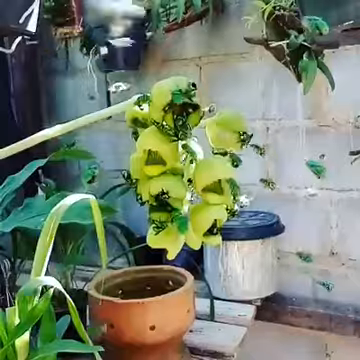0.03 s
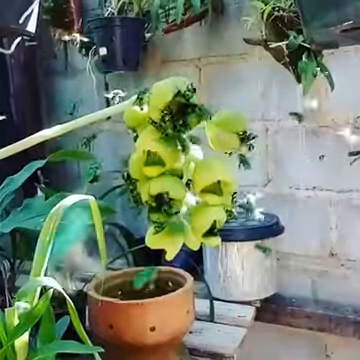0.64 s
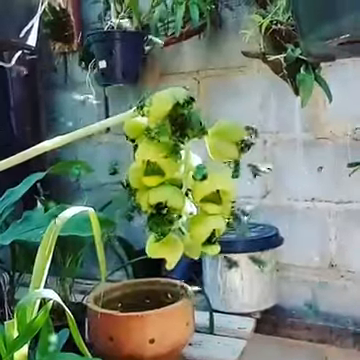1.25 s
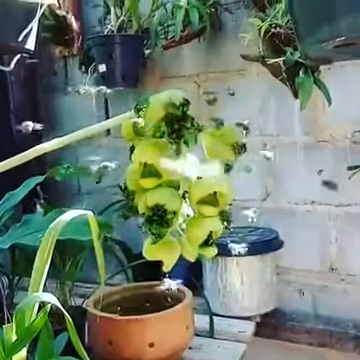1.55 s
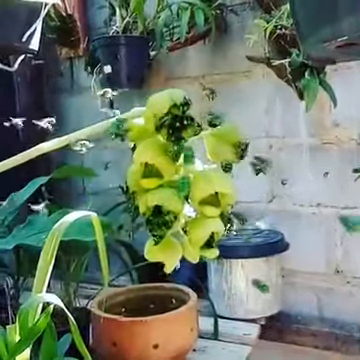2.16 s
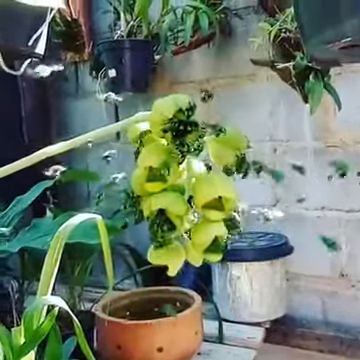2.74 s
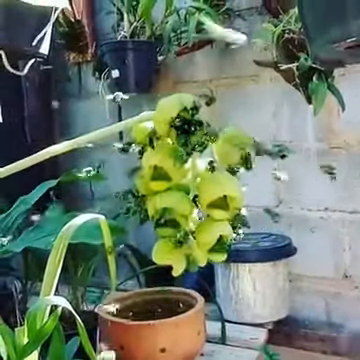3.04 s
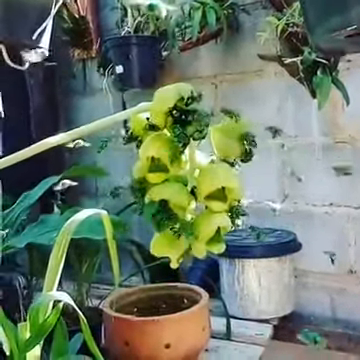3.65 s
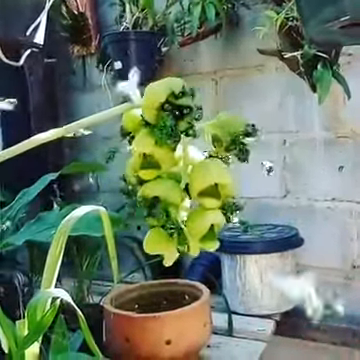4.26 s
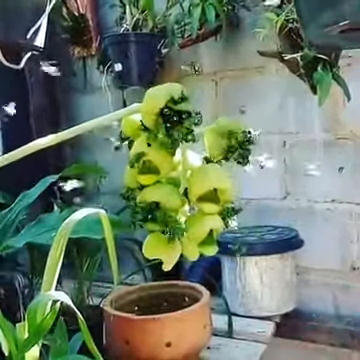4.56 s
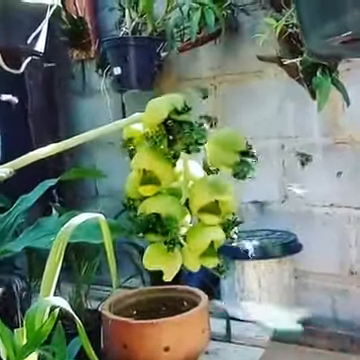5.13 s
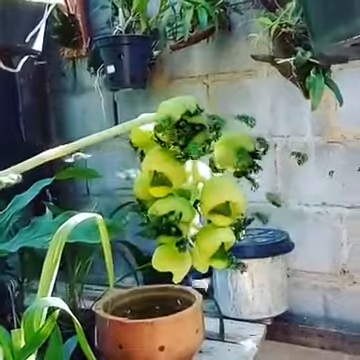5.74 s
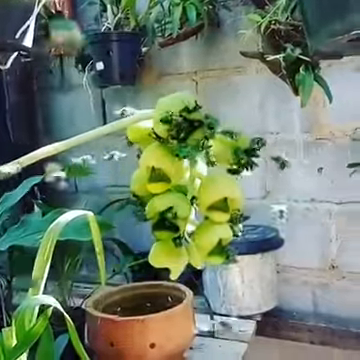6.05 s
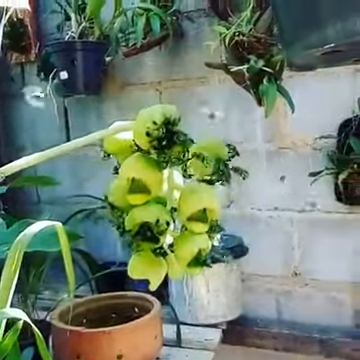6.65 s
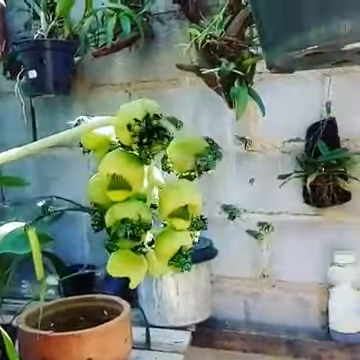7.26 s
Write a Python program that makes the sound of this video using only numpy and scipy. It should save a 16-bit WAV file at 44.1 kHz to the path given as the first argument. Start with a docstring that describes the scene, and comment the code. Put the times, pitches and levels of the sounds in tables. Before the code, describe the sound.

After a moment of silence, the dense hum of many small bees fades in around flowers in a walled yard, with a faint fizz of wings. The microphone takes one soft bump. Single bees swell past close by. A quick run of high, hissy rasps, perhaps a small bird, rings between the walls, and a few more follow later. Far traffic and a low engine drone continue underneath.

```python
"""The hum of small bees fades in, close by, as they work an orchid spike in a walled yard.
Each bee's periodic wing stroke radiates harmonics of a wandering wingbeat and a puff of air noise.
The microphone takes one soft bump; rasping, hissy bursts (perhaps a small bird) ring between the walls.
Far off, an engine and passing vehicles drone under a broad wash of traffic and open air."""
import sys
import numpy as np
from scipy import signal
from scipy.fft import rfft, irfft, next_fast_len
from scipy.io import wavfile
from scipy.ndimage import map_coordinates

SR = 44100
rng = np.random.default_rng(int(sys.argv[2]) if len(sys.argv) > 2 else 0)


def int16_out(signal):
    """Quantize to a 16-bit WAV file."""
    q = np.round(np.clip(np.atleast_2d(signal).T, -1, 1) * 32767)
    wavfile.write(sys.argv[1], SR, q.astype(np.int16))


N = 330750

# spectral envelope of the wingbeat's harmonics: (frequency [Hz], relative level [dB])
WING_SPECTRUM = [(240, -4.4), (480, -.8), (690, -2.5), (800, -8.5), (970, -8), (1250, -5.5), (1380, -10.5),
                 (1500, -8.5), (1750, -15), (2300, -13.5), (2750, -22), (3500, -21.5), (6500, -23),
                 (8500, -32.5)]


def amp(db):
    """Amplitude ratio of a level: tenfold for every 20 dB."""
    return 10 ** (np.asarray(db) / 20)


def unit(x):
    """Normalisation to an rms of 1."""
    return x / np.sqrt(np.mean(x ** 2) + 1e-20)


def curves(rows):
    """Linear interpolation of each column after the time, one value per sample."""
    times, *columns = np.transpose(rows)
    return [np.interp(np.arange(N) / SR, times, column) for column in columns]


def wobble(rate):
    """Smooth random modulation: a spline through Gaussian knots, rate of them a second."""
    at = np.linspace(0, N, 6000)
    knots = rng.standard_normal(1024)
    spline = map_coordinates(knots, [at * rate / SR], mode="wrap")
    return np.interp(np.arange(N), at, spline)


def filtered(x, response):
    """Linear filtering: the spectrum of x times a frequency response."""
    size = next_fast_len(len(x) + SR // 10, real=True)
    return irfft(rfft(x, size) * response(np.fft.rfftfreq(size, 1 / SR)), size)[:len(x)]


def coloured(x, spectrum):
    """Spectral shaping of x by (frequency [Hz], relative level [dB]) points, to an rms of 1."""
    points_hz, db = np.transpose(spectrum)
    return unit(filtered(x, lambda hz: amp(np.interp(np.log(hz + 1), np.log(points_hz), db))))


def cycles(hz):
    """Phase in cycles: the time integral of frequency, from a random start."""
    return np.cumsum(hz) / SR + rng.random()


def bee(beat_hz, scatter_rad, uneven_db, harmonics=34, size=4096):
    """A periodic wing stroke gives a harmonic series. Returns the tone and the envelope of its puffs."""
    phase, strength = rng.standard_normal((2, harmonics))
    partials = amp(uneven_db * strength) * np.exp(1j * scatter_rad * phase)
    stroke = unit(irfft(np.r_[0, partials], size))
    puff = np.cos(np.pi * np.arange(size) / size) ** 8
    place = (cycles(beat_hz) * size).astype(int) % size
    return stroke[place], puff[place]


def swarm(beat_hz=243.5, spread=.038, wander=.031, flutter=.017, swoop_db=4.0, count=24):
    """Incoherent sources: independent wingbeats add into a hum, their turbulent puffs into a fizz."""
    # the swarm crowds in and thins out: (time [s], hum level [dB], fizz level [dB]), before the trims
    crowding = [(0.95, -50, -62), (1.4, -50.5, -59), (1.75, -50, -61), (2.0, -50.5, -59.5),
                (3.05, -51.5, -60.0), (3.5, -50.5, -58.5), (3.78, -49, -57.9), (4.0, -49.5, -58),
                (4.4, -48.5, -64.5), (4.75, -51, -59), (5.0, -50, -61.5), (5.3, -51.5, -66),
                (5.65, -48.5, -58.5), (5.9, -53, -63), (6.3, -50, -58.5), (6.85, -52, -60),
                (7.2, -49.5, -58), (7.5, -52, -58.5)]
    # air torn by the wing tips: (frequency [Hz], relative level [dB])
    fizz_spectrum = [(1500, -15.5), (1950, -2.5), (2350, 3), (2700, -4.5), (3500, -2.5), (3800, -11.5),
                     (4150, -0.5), (5000, 2.5), (5450, -0.5), (6700, .5), (6850, -4.5), (7450, -1.5),
                     (7750, -11), (8600, -12.5)]
    hum_trim_db, fizz_trim_db = .28, -1.0
    hum, puff_power = np.zeros(N), np.zeros(N)
    for rank in np.linspace(-1, 1, count):
        detune = spread * rank * (1 + rank ** 2 / 2)
        # steering bends the wingbeat slowly, small adjustments quickly
        pitch = beat_hz * (1 + detune + wander * wobble(6) + flutter * wobble(35))
        nearness = amp(swoop_db * 2 * np.tanh(wobble(5) / 2))
        tone, puff = bee(pitch, scatter_rad=1.084, uneven_db=2.5)
        hum += nearness * tone
        puff_power += nearness ** 2 * puff
    hum_db, fizz_db = curves(crowding)
    fizz = coloured(np.sqrt(puff_power) * rng.standard_normal(N), fizz_spectrum)
    return amp(hum_db + hum_trim_db) * coloured(hum, WING_SPECTRUM) + amp(fizz_db + fizz_trim_db) * fizz


def close_bees(doppler=.008, flutter=.016, waver_db=1.5, trim_db=-.5, near_bass_db=3):
    """Spherical spreading and Doppler shift: a passing bee's pressure goes as 1/r and its pitch sinks."""
    # each bee at its closest: (time [s], wingbeat [Hz], level before the trim [dB])
    passes = [(1.52, 245.3, -54.5), (1.76, 242.6, -54), (2.62, 242.8, -54.5), (2.792, 241, -56.5),
              (3.17, 239.2, -52.5), (3.75, 235.0, -53.5), (4.19, 239.3, -53.5), (4.51, 249.1, -55),
              (5.63, 251, -55), (5.71, 232.1, -54.5), (5.99, 231.8, -54.5), (6.252, 231.1, -55.5),
              (6.54, 233.4, -55.5), (7.19, 231.8, -53.5)]
    half_power_s, reach_s = .09, .6  # from the closest point until 3 dB down, until lost in the hum
    t, out = np.arange(N) / SR, np.zeros(N)
    for closest_s, beat_hz, db in passes:
        near = np.abs(t - closest_s) < reach_s
        along = (t[near] - closest_s) / half_power_s
        distance = np.hypot(1, along)  # in multiples of the closest distance
        pitch = beat_hz * (1 - doppler * along / distance + flutter * wobble(22)[near])
        tone, _ = bee(pitch, scatter_rad=1.4, uneven_db=1.5)
        edges = signal.get_window(("tukey", .5), len(tone))
        out[near] += edges * amp(db + trim_db + waver_db * wobble(12)[near]) / distance * tone
    # in the near field, the air pushed by the wings lifts the fundamental
    (fundamental_hz, fundamental_db), *overtones = WING_SPECTRUM
    return out.std() * coloured(out, [(fundamental_hz, fundamental_db + near_bass_db), *overtones])


def scratch(rough_db=1.5, grain_rate=260):
    """Roughness from fast random amplitude modulation: one second of grainy noise."""
    grain = amp(rough_db * 2 * np.tanh(wobble(grain_rate)[:SR] / 2))
    return grain * rng.standard_normal(SR)


def rasps(rise_s=.015, hiss_t60=.45):
    """Exponential decay: each burst's broad hiss and narrow resonance trail off between the walls."""
    # (time [s], ring level [dB], ring pitch [Hz], hold [s], ring's 60 dB decay [s], hiss level [dB])
    bursts = [(2.138, -63.5, 6200, .06, .4, -71), (2.207, -53, 4260, 0.14, .95, -60),
              (2.426, -49.5, 4270, .055, .9, -48.5), (2.511, -48.5, 4240, .06, 1, -61),
              (2.663, -45.5, 4310, 0.053, 0.92, -45.5), (2.758, -42.5, 4200, 0.043, .6, -64),
              (2.909, -54.5, 4300, 0.043, .3, -53), (4.601, -47.5, 5120, .02, .25, -49.5),
              (4.639, -58, 4160, 0.044, 0.55, -57.5), (4.822, -67, 5000, 0.047, .5, -61.5),
              (4.982, -65, 4340, 0.049, .3, -65), (6.277, -67, 4360, .06, .4, -59)]
    # the narrow resonance: (frequency [multiple of the ring pitch], relative level [dB])
    ring_spectrum = [(.76, -41.5), (.85, -24.5), (.88, -10.5), (.95, -6.5), (1, 2.5), (1.035, -5),
                     (1.08, -4.5), (1.18, -16.5), (1.28, -28), (2, -45)]
    # the broad hiss: (frequency [Hz], relative level [dB])
    hiss_spectrum = [(900, -22), (1300, -1), (1800, -11), (2400, -0.5), (3000, -11), (4300, -4.5),
                     (5000, -3.5), (5450, -2), (5750, 1), (6600, 0), (6950, -5), (7500, -6.5), (8100, -17),
                     (8600, -22)]
    t, out = np.arange(SR) / SR, np.zeros(N + SR)
    for start_s, ring_db, ring_hz, hold_s, ring_t60, hiss_db in bursts:
        onset = np.minimum(t / rise_s, 1)
        since_hold = np.maximum(t - hold_s, 0)
        resonance = [(ring_hz * multiple, db) for multiple, db in ring_spectrum]
        ring = amp(ring_db - 60 * since_hold / ring_t60) * coloured(scratch(), resonance)
        hiss = amp(hiss_db - 60 * since_hold / hiss_t60) * coloured(scratch(), hiss_spectrum)
        out[round(start_s * SR):][:SR] += onset * (ring + hiss)
    return out[:N]


def bump(width_s=.0015):
    """A soft impact on the microphone: a smooth push and rebound carries little treble."""
    # the touch: (time [s], peak level [dB], frequency [Hz])
    touches = [(1.1, -29, 320)]
    t = np.arange(N) / SR
    return sum(amp(db) * np.exp(-((t - peak_s) / width_s) ** 2) * np.cos(2 * np.pi * hz * (t - peak_s))
               for peak_s, db, hz in touches)


def engine(firing_hz=42.7, second_harmonic_db=-3.5):
    """Periodic firing: a far engine sounds at its firing rate and the octave above."""
    # the fundamental eases, then swells: (time [s], level [dB])
    swell = [(1.0, -58.5), (3.0, -58.5), (4.3, -61.5), (6.6, -50.5), (7.5, -54)]
    db, = curves(swell)
    phase = 2 * np.pi * cycles(firing_hz * (1 + .01 * wobble(6)))
    fundamental = amp(db + 2 * wobble(10)) * np.sin(phase)
    octave = amp(db + second_harmonic_db + 2 * wobble(9)) * np.sin(2 * phase)
    return fundamental + octave


def vehicle_drones(edge_s=.27, waver_db=-.3):
    """Linear frequency glide: each far vehicle is one low tone that swells, slides and fades."""
    # (start time [s], duration [s], first pitch [Hz], last pitch [Hz], level [dB])
    vehicles = [(3.8, 1.36, 99, 103.2, -53.5), (5.599, 2.4, 76.4, 61.9, -58.5)]
    t, out = np.arange(N) / SR, np.zeros(N)
    for start_s, length_s, first_hz, last_hz, db in vehicles:
        end_s = start_s + length_s
        envelope = np.clip(np.minimum(t - start_s, end_s - t) / edge_s, 0, 1)
        hz = np.interp(t, [start_s, end_s], [first_hz, last_hz])
        out += envelope * amp(db + waver_db * wobble(8)) * np.sin(2 * np.pi * cycles(hz))
    return out


def background():
    """Ambient noise: distant traffic and open air merge into a continuous, bass-heavy spectrum."""
    # the yard's ambient noise: (frequency [Hz], relative level [dB])
    air_spectrum = [(12, -12), (35, -9.5), (65, -4.5), (100, 1.5), (135, -1), (153, 3), (175, -4),
                    (205, -2.5), (330, -8.5), (400, -8.5), (600, -11.5), (1100, -12), (2200, -24),
                    (3000, -26), (6500, -31), (8600, -37)]
    # its slow drift: (time [s], level [dB])
    air_level = [(1.0, -53), (1.9, -50.5), (4.2, -53), (7.5, -52)]
    air_db, = curves(air_level)
    return amp(air_db + .8 * wobble(6)) * coloured(rng.standard_normal(N), air_spectrum)


def scene():
    """Superposition: the pressures of all sources add at one microphone."""
    return (swarm() + close_bees() + rasps() + bump() + engine() + vehicle_drones() + background())[None]


def record(dry):
    """Gating and band limiting: silence, a short fade-in, and no treble above a steep edge."""
    open_s, first_gain, fade_s = .651, .2, .23
    top_hz, edge_hz = 8680, 100
    since_open = np.arange(N) / SR - open_s
    gain = np.interp(since_open, [0, fade_s], [first_gain, 1], left=0)
    return filtered(dry[0] * gain, lambda hz: np.clip((top_hz - hz) / edge_hz + 1, 0, 1))[None]


dry = scene()
out = record(dry)
int16_out(out)
```